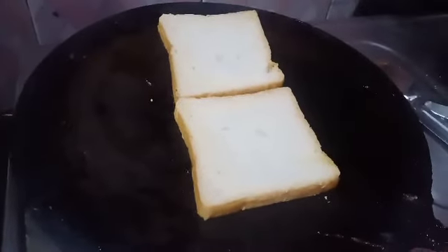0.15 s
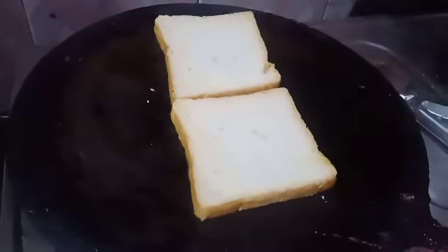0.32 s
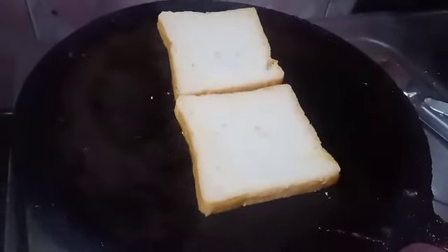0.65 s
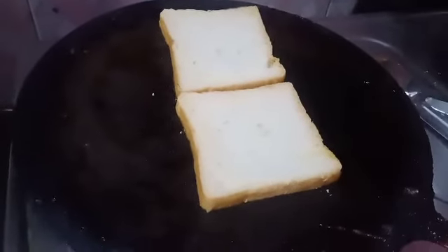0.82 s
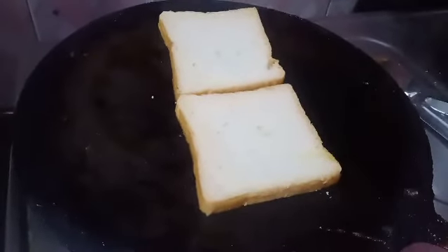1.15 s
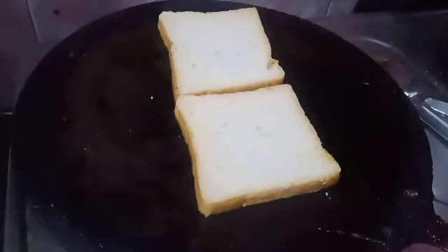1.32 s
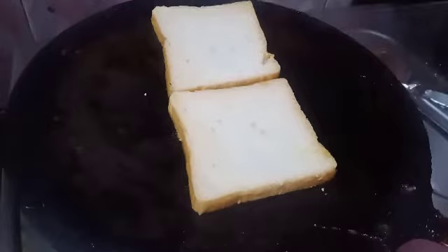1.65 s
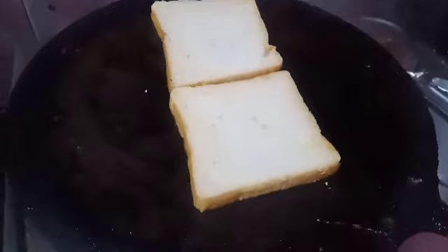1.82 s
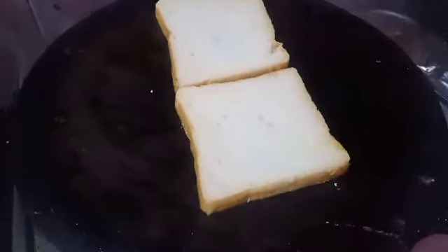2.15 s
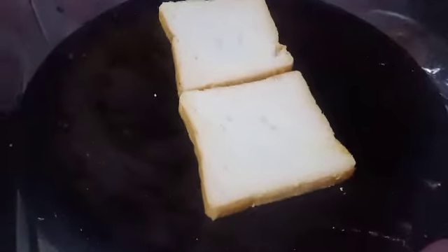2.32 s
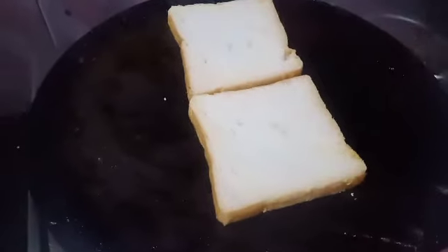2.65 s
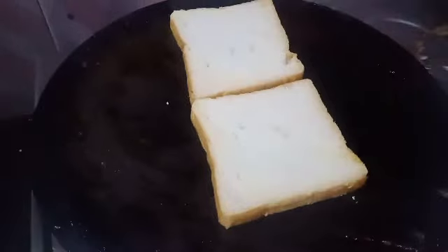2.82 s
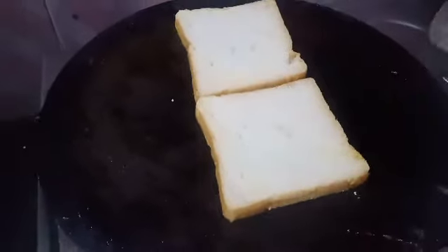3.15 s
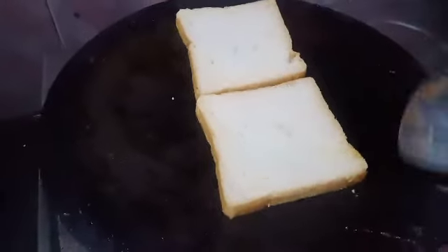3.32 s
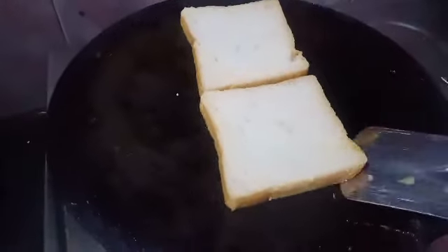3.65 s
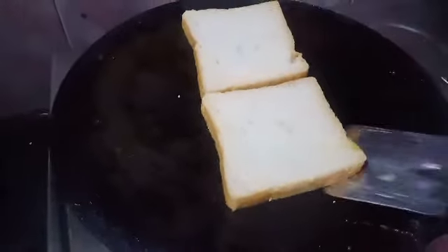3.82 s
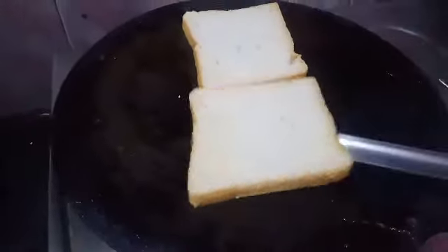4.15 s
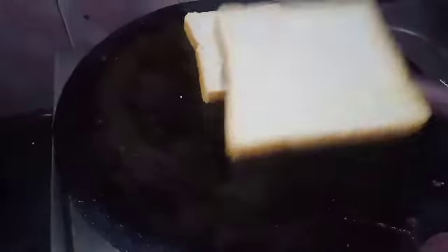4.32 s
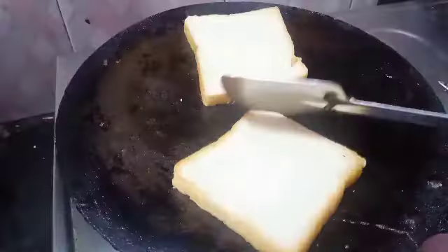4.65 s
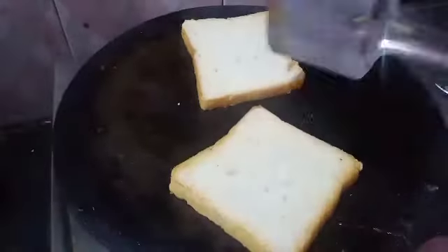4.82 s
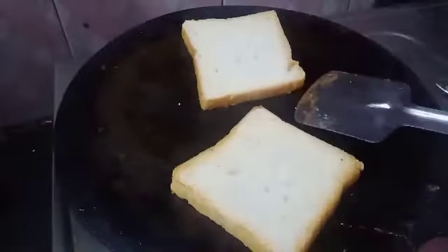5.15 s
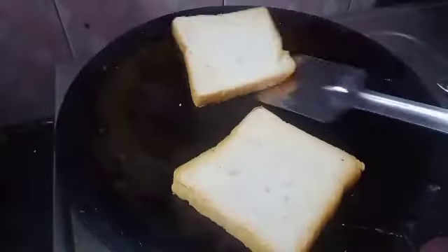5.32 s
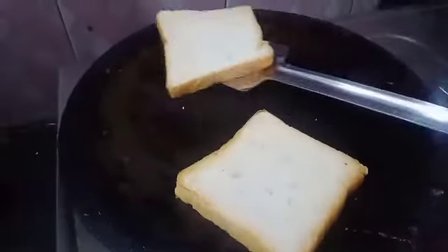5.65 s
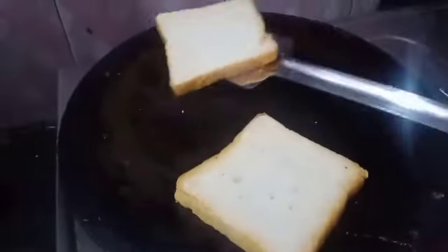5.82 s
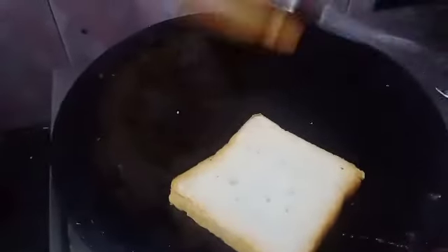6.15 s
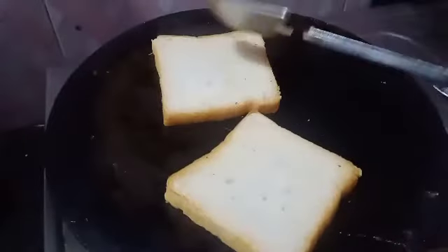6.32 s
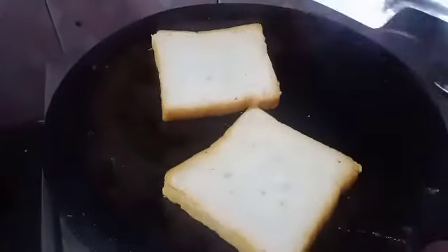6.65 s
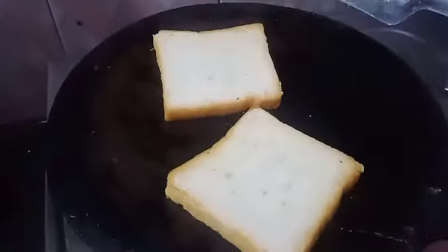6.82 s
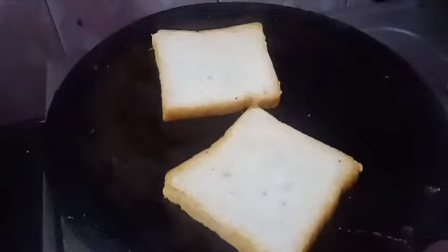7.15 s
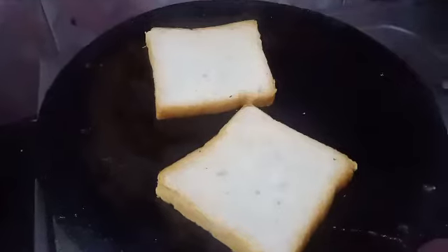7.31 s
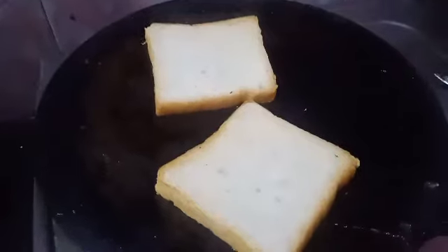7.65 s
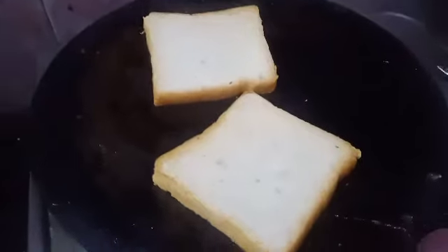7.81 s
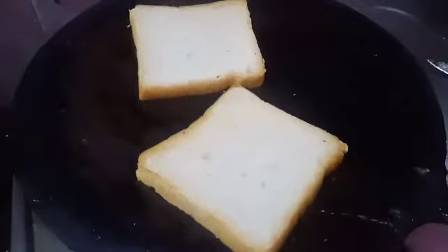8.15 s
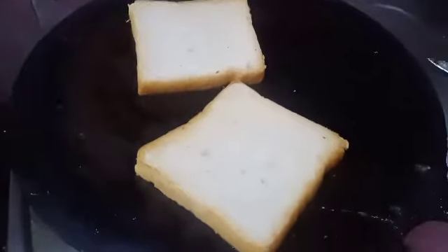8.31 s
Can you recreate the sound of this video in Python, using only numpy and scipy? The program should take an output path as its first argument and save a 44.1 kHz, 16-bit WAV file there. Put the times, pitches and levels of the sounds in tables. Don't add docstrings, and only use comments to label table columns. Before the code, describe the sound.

Faint griddle sizzle and spitting fat over distant street rumble, with a steel cup clink, ringing spatula knocks, gritty scrapes and soft bread slaps.

```python
import sys
import numpy as np
from scipy import signal
from scipy.fft import rfft, irfft, next_fast_len
from scipy.io import wavfile
from scipy.ndimage import uniform_filter1d, map_coordinates

SR = 44100
rng = np.random.default_rng(int(sys.argv[2]) if len(sys.argv) > 2 else 0)


def waveform_to_disk(signal):
    frames = np.transpose(np.atleast_2d(signal))
    scaled = np.clip(frames, -1, 1) * 32767
    samples = np.round(scaled).astype(np.int16)
    wavfile.write(sys.argv[1], SR, samples)


def boost(x):
    u = np.asarray(x, float) / 20
    return 10 ** u


N = 373022
TIME = np.arange(N) / SR


def rms_one(x):
    return x / np.sqrt(np.mean(x ** 2) + 1e-20)


def in_time(rows):
    s, *columns = np.transpose(rows)
    return [np.interp(TIME, s, c) for c in columns]


def at_hz(points, hz):
    points_hz, points_db = np.transpose(points)
    return np.interp(np.log(hz + 1), np.log(points_hz), points_db)


def coloured(x, spectrum):
    size = next_fast_len(N)
    gain = boost(at_hz(spectrum, np.arange(size // 2 + 1) * SR / size))
    return rms_one(irfft(rfft(x, size) * gain, size)[..., :N])


def drift(rate_hz):
    r = np.exp(-80 * np.pi * rate_hz / SR)
    white = rng.standard_normal(N // 40 + 2002)
    slow = signal.lfilter([1], [1, -2 * r, r * r], white)[2000:]
    return np.interp(np.arange(N) / 40, np.arange(len(slow)), rms_one(slow))


def resonance(x, hz, width_hz):
    r = np.exp(-np.pi * width_hz / SR)
    zeros = np.array([1, 0, -1]) * (1 - r * r) / 2
    poles = [1, -2 * r * np.cos(2 * np.pi * hz / SR), r * r]
    return signal.lfilter(zeros, poles, x + 1e-18)


def band(x, low_hz, high_hz):
    return signal.sosfilt(signal.butter(2, [low_hz, min(high_hz, .45 * SR)], "band", fs=SR, output="sos"), x)


def grains(per_s, spread_db):
    sizes = boost(spread_db * np.minimum(rng.exponential(1, N), 4)) * rng.choice([-1, 1], N)
    return sizes * (rng.random(N) < per_s / SR)


def struck(modes, blows, crack_octaves, crack_t60, rattle_db, uneven_db=6.0, ripple_db=3.5,
           rise_cycles=2.67, rise_s=0.00017):
    out = np.zeros(N + 32768)
    t, f = np.arange(32768) / SR, np.arange(16385) * SR / 32768 + 1
    hz, level_db, t60 = np.transpose(modes)[:, :, None]
    wobble = np.array([np.interp(t * 80, np.arange(64), row) for row in rng.standard_normal((len(modes), 64))])
    rise = np.minimum(t * hz / rise_cycles, 1) * np.minimum((t[-1] - t) / 0.13, 1)
    mode_rattle_db = rattle_db * np.sqrt(1 + hz / 3000) / (1 + t60) * wobble
    rings = boost(level_db - 60 * t / t60 + mode_rattle_db) * np.sin(2 * np.pi * hz * t) * rise
    ripple = boost(ripple_db * rms_one(uniform_filter1d(rng.standard_normal(len(f)), size=30)))
    decay = boost(-60 * t / crack_t60 + rattle_db * wobble[0]) + .5 * np.exp(-t / 0.0017)
    crack_shape = decay * np.minimum(t / rise_s, 1)
    for s, ring_db, crack_db, crack_hz in blows:
        low_hz, high_hz = crack_hz / 2 ** crack_octaves, crack_hz * 2 ** crack_octaves
        edges = 1 / (1 + (low_hz / f) ** 6) / (1 + (f / high_hz) ** 4)
        noise = rms_one(irfft(rfft(rng.standard_normal(len(t))) * ripple * edges))
        ring = boost(ring_db + uneven_db * rng.standard_normal(len(modes))) @ rings
        at = round(s * SR)
        out[at:at + len(t)] += ring + boost(crack_db) * noise * crack_shape
    return out[:N]


def spits(small_per_s):
    # start_s, peak_db
    round_spits = [(0.0124, -42), (0.2371, -33.5), (0.7478, -40), (0.847, -44), (4.5268, -35),
                   (4.5437, -25.5), (4.9412, -28), (5.238, -33), (5.9535, -40.5), (6.0973, -37),
                   (6.1094, -31.5), (6.3167, -40), (6.559, -39), (6.604, -34), (6.6184, -32), (6.6328, -31),
                   (6.8088, -43), (6.9082, -32), (7.0025, -25.5), (7.129, -25), (7.239, -34.5),
                   (7.3414, -24.5), (7.425, -37), (7.5415, -38), (7.5943, -39), (7.7313, -32),
                   (7.7552, -36), (7.8712, -27), (8.0846, -27.5)]
    # start_s, peak_db
    sharp_spits = [(0.0014, -37.5), (0.2508, -39), (0.9288, -43), (3.5887, -39), (6.265, -35),
                   (6.3761, -41), (6.4013, -34), (7.082, -39), (7.1153, -38), (7.4681, -34), (7.6962, -28),
                   (7.832, -41), (7.8982, -31), (8.022, -40), (8.0425, -30.5), (8.1044, -32.5),
                   (8.272, -39)]
    s, peak_db = np.transpose(np.concatenate([round_spits, sharp_spits]))
    bright_db = np.repeat([-21, -12], [len(round_spits), len(sharp_spits)])
    at = np.round(s * SR).astype(int)
    body = boost(-44) * grains(small_per_s, spread_db=3.0)
    top = body * boost(-13)
    body[at] = boost(peak_db + 20.0)
    top[at] = boost(peak_db + bright_db + 25)
    spray_s = 0.0064
    trail = signal.lfilter([1], [1, -np.exp(-1 / (spray_s * SR))], np.abs(body))
    spray = trail * rng.standard_normal(N) * boost(-25.0)
    broad = resonance(band(band(body + spray, 3550, 16900), 3300, 19000), 6520, 1540)
    return broad + band(top + spray * boost(-9.5), 8100, 18800)


def sizzle(hiss_db, top_db):
    # hz, db_per_hz
    hiss = [(2060, -67), (3500, -14.5), (3770, -63), (4380, -11), (4760, -9.5), (6690, 2.5), (7370, -5.5),
            (10500, -20), (13600, -28.5), (22000, -120)]
    # hz, db_per_hz
    top_hiss = [(4710, -19.5), (8000, -11), (9200, -13), (12100, -4), (14800, -2.5), (15800, 1.5)]
    bursts = grains(12000, spread_db=2.0) * boost(1.0 * drift(29.5))
    return boost(hiss_db) * coloured(bursts, hiss) + boost(top_db) * coloured(bursts, top_hiss)


def traffic():
    # hz, db_per_hz
    street_colour = [(210, -37), (350, 7.5), (378, -26.5), (599, -0.5), (675, -15), (879, -0.5),
                     (1080, -3.5), (2020, -5), (2870, 0), (4800, -13), (6240, -33), (10600, -120)]
    # time_s, level_db
    murmur = [(0, -65.5), (.6, -62), (1.4, -63), (2.1, -67), (3.1, -63.5), (4.1, -64.5), (4.9, -67),
              (5.9, -66.5), (6.6, -65.5), (7.5, -64.5), (8.46, -64)]
    white = rng.standard_normal((2, N))
    edges_hz = 330 * 2 ** np.arange(0, 4.1, .25)
    out = np.zeros(N)
    for k, (low, high) in enumerate(zip(edges_hz, edges_hz[1:])):
        level_db = at_hz(street_colour, np.sqrt(low * high)) + 3.0 * drift(5.5)
        out += boost(level_db) * band(white[k % 2], low, high)
    rumble = boost(-73.5) * rms_one(band(white[1], 35, 215))
    return boost(in_time(murmur)[0]) * rms_one(out) + rumble


def swells(rows, floor_db):
    rise_s, fall_s = 0.023, 0.021
    s, hold_s, db = np.transpose(rows)[:, :, None]
    t = TIME[::100]
    shape = np.exp(-np.maximum(s - t, 0) / rise_s - np.maximum(t - s - hold_s, 0) / fall_s)
    return boost(floor_db + 3.4 * drift(4.2)) + np.interp(TIME, t, np.sum(boost(db) * shape, axis=0))


def booms():
    # hz, width_hz
    room_modes = [
        (98, 29.2),
        (245, 71),
    ]
    # start_s, hold_s, level_db
    low_swells = [(0.067, 0.33, -60.5), (1.198, 0.058, -58.5), (3.32, 0.032, -64), (3.77, 0.025, -55.5),
                  (4.375, 0.031, -59), (4.864, 0.025, -56), (5.163, .02, -67), (5.7, 0.054, -64),
                  (6.123, 0.024, -54), (6.336, 0.032, -55), (6.66, 0.015, -61), (7.15, 0.026, -53.5),
                  (7.596, 0.12, -55), (7.978, 0.038, -47)]
    # start_s, hold_s, level_db
    upper_swells = [(1.398, 0.015, -56), (2.372, 0.14, -53.5), (2.664, 0.14, -51.5), (3.34, .04, -60),
                    (4.242, 0.071, -61.5), (4.576, 0.05, -52.5), (4.844, 0.017, -67), (5.142, 0.016, -62),
                    (5.328, 0.2, -59), (6.124, 0.063, -62), (7.033, 0.047, -60.5), (7.252, 0.02, -57), ]
    out = np.zeros(N)
    for (hz, width_hz), rows, floor_db in zip(room_modes, (low_swells, upper_swells), (-69.5, -70.5)):
        noise = resonance(resonance(rng.standard_normal(N), hz, width_hz), hz, width_hz)
        out += swells(rows, floor_db) * rms_one(noise)
    return out


def far_tones():
    # start_s, end_s, pitch_hz, width_hz, level_db
    tones = [(0, 0.89, 3400, 115, -61.5), (6.85, 7.1, 935, 30, -63), (7.04, 7.24, 1050, 12, -60),
             (7.35, 7.52, 840, 91, -65), (7.75, 7.9, 1080, 40, -67), (8.1, 8.25, 900, 40, -66),
             (1.5, 1.65, 600, 45, -68), (7.38, 7.5, 2870, 300, -65), (4.45, 4.8, 3450, 60, -69),
             (4.5, 4.93, 4760, 60, -73), (8.1, 8.3, 3350, 60, -68)]
    white, out = rng.standard_normal(N), np.zeros(N)
    for start, end, hz, width_hz, db in tones:
        span = slice(max(round((start - .2) * SR), 0), round((end + .1) * SR))
        t = TIME[span]
        swell = np.clip(np.minimum(t - start + 0.013, end - t + 0.023) / 0.051, 0, 1)
        out[span] += boost(db) * swell * rms_one(resonance(resonance(white[span], hz, width_hz), hz, width_hz))
    return out


def cup():
    cup_hz = [700, 1370, 2750, 3050, 3078, 3117, 4436, 5204, 5222, 6573, 6980, 7085, 8872, 9609, 9771,
              10820, 10980, 11490, 13890, 14730, 15360]
    # level_db, t60_s
    cup_ring = [(-25, .15), (-23, .13), (-18, .07), (-9, .22), (3, .42), (-10, .3), (-28, .1), (-4, .45),
                (-14, .3), (-16, .14), (-6, .25), (-16, .25), (-10, .22), (-18, .18), (-14, .2), (-9, .12),
                (-12, .2), (-15, .2), (-24, .11), (-18, .2), (-18, .12)]
    # start_s, ring_db, crack_db, crack_hz
    cup_blows = [
        (.9912, -33, -26, 8100),
        (.9991, -27, -42, 1500),
        (1.0088, -38, -33, 9000),
        (1.0254, -27, -40, 8500),
        (1.101, -46, -50, 12400),
        (1.139, -46, -51, 10000),
    ]
    gripped_s, grip_db_per_s = 1.17, 170
    rings = struck(np.column_stack([cup_hz, cup_ring]), cup_blows, .8, .1, rattle_db=.6, uneven_db=.6)
    return rings * boost(-grip_db_per_s * np.clip(TIME - gripped_s, 0, 1))


def stove_knocks():
    # pitch_hz, level_db, t60_s
    stove_modes = [(314.3, 4, 0.18), (748, -9, 0.22), (947, -8, 0.14), (1314, -10, 0.14), (1507, -14, 0.12),
                   (2439, -13, 0.09), (3930, -13, 0.088), (4280, -23, 0.14), (7200, -24, .11)]
    # start_s, ring_db, crack_db, crack_hz
    stove_blows = [
        (2.369, -41, -32.5, 1460),
        (2.37, -50, -36.5, 9500),
        (2.383, -38, -32, 880),
    ]
    # start_s, ring_db, crack_db, crack_hz
    stove_slides = [
        (2.43, -67, -43, 1800),
        (2.479, -51.5, -44, 1800),
    ]
    knock = struck(stove_modes, stove_blows, 1.5, 0.1, rattle_db=4.0, rise_s=.0015)
    return knock + struck(stove_modes, stove_slides, 2.7, 0.2, rattle_db=2.5, rise_s=0.027)


def rubbed(catches, t, modes, wander_db):
    # time_s, pitch_hz, boost_db
    bites = [(2.465, 14200, 8), (2.47, 10600, 8), (3.745, 1260, 6), (3.815, 1260, 8), (3.86, 1260, 8),
             (3.87, 2310, 12), (3.945, 2310, 10), (3.95, 1260, 4), (3.945, 7890, 8), (3.79, 10800, 6),
             (5.325, 1570, 11), (5.358, 1570, 10), (5.388, 1570, 7)]
    bite_s = 0.0091
    out = 0
    for hz, width_hz, db in modes:
        bite_db = 0
        for s, bitten_hz, boost_db in bites:
            if abs(hz / bitten_hz - 1) < .04:
                bite_db = bite_db + boost_db * np.exp(-((t - s) / bite_s) ** 2)
        ring = rms_one(resonance(resonance(catches, hz, 0.75 * width_hz), hz, 5.4 * width_hz))
        grip_db = wander_db * drift(18.6)[:len(t)]
        out = out + boost(db + bite_db + grip_db) * ring * np.sqrt(width_hz)
    return out


def scrapes():
    # time_s, level_db
    strokes = [
        [(2.39, -55), (2.44, -57), (2.5, -48), (2.54, -53), (2.62, -79)],
        [(3.72, -45), (3.76, -44), (3.81, -38), (3.87, -37.5), (3.9, -49), (3.945, -38.5), (3.985, -50.5),
         (4.06, -67), (4.15, -71)],
        [(5.08, -50), (5.14, -49.5), (5.23, -43.5), (5.31, -45), (5.36, -40.5), (5.42, -48), (5.5, -57.5),
         (5.65, -76)],
    ]
    # pitch_hz, width_hz, level_db
    drag_low = [
        [(722, 37, 9), (1060, 23, 4), (1300, 50, -6), (1570, 35, -9), (1890, 87, -18), (2260, 130, -14),
         (3500, 22, -13), (3810, 110, -16), (4700, 34, -11)],
        [(1266, 57, -3.5), (1520, 52, -1), (1890, 33, -9), (2314, 61, -1), (2520, 29, -1), (3150, 110, -10),
         (3360, 62, -19), (3530, 40, -10), (4400, 47, -9), (4200, 44, -11), (4840, 63, -11)],
        [(1400, 26, 2), (1564, 86, -0.5), (1857, 31, 0), (2090, 35, -7), (2356, 100, -5), (2660, 27, -22),
         (3130, 53, -18), (3400, 79, -8), (4050, 43, -22), (4450, 64, -33), (4700, 110, -32)],
    ]
    # pitch_hz, width_hz, level_db
    drag_high = [
        [(6200, 190, -9), (7240, 37, 4), (7910, 28, 4), (8580, 46, -17), (9050, 46, -15), (10700, 34, -2),
         (12600, 42, -13), (13300, 32, -13), (14200, 45, 0), (14900, 120, -13)],
        [(5500, 38, -6), (5700, 130, -16), (6200, 120, -8), (7000, 29, -1), (7250, 39, -1), (7820, 50, -1),
         (10000, 110, -19), (10800, 48, -6.5), (12600, 160, -20), (13100, 83, -16), (14000, 160, -15),
         (15400, 200, -20)],
        [(5410, 91, 0), (5750, 130, -1), (6120, 80, 3), (6800, 64, 2), (7210, 61, -9), (7890, 65, -4),
         (9100, 50, -3), (9700, 150, -19), (10900, 260, -24), (13100, 85, -13), (14200, 34, -10),
         (15200, 67, -15)],
    ]
    drag_high_db = [-5, -11, -8.5]
    # upper_db, upper_db_per_s, hum_db, hum_db_per_s
    stroke_colour = [
        (3, -3, -75, -10),
        (-6.5, 19.5, -67, -51),
        (-8, 25, -63, 17),
    ]
    # pitch_hz, width_hz, level_db
    plate_hum = [
        (317, 8.9, 1.5),
        (566, 73, -16),
        (840, 250, -19),
    ]
    # hz, db_per_hz
    grit_colour = [(1530, -36), (2600, 2), (3480, -3), (3810, -4.5), (6320, 0.5), (8530, -15), (11600, -17),
                   (15500, -11.5)]
    firm_db = -43.5
    catches = grains(4000, spread_db=2.0) * boost(.8 * drift(23.5) + 1.5 * drift(120))
    grit = coloured(catches, grit_colour)
    out = np.zeros(N)
    for stroke, low, high, high_db, colour in zip(strokes, drag_low, drag_high, drag_high_db, stroke_colour):
        upper_db, upper_db_per_s, hum_db, hum_db_per_s = colour
        span = slice(round(stroke[0][0] * SR), round(stroke[-1][0] * SR))
        t, rub = TIME[span], catches[span]
        ring_db, gone_s = in_time(stroke)[0][span], t - stroke[0][0]
        upper_db = upper_db + upper_db_per_s * gone_s
        grit_db = np.minimum(0.69 * (firm_db - ring_db), -1.5)
        hum_db = hum_db + hum_db_per_s * gone_s + 0.82 * (ring_db - firm_db)
        lower = rubbed(rub, t, low[:3], wander_db=4.0)
        upper = rubbed(rub, t, low[3:], wander_db=4.0)
        upper = upper + boost(high_db) * rubbed(rub, t, high, wander_db=4.0)
        blade = (lower + boost(upper_db) * upper) / np.std(lower + upper) + boost(grit_db - 2.0) * grit[span]
        hum = boost(hum_db) * rms_one(rubbed(rub, t, plate_hum, wander_db=7.0))
        out[span] = np.minimum(gone_s / 0.037, 1) * (boost(ring_db) * blade + hum)
    return out


def blade_knocks():
    # pitch_hz, level_db, t60_s
    lifted_modes = [(232, 0, .2), (473, -10, .13), (678, -17, .12), (980, -19, .13), (1266, -12, .1),
                    (1425, -17, .3), (1518, -9, .14), (1878, -17, .1), (2330, -21, .09), (3558, -27, .6),
                    (4414, -33, .25), (4861, -29, .22), (6530, -28, .06), (11000, -30, .04)]
    set_down_modes = [(231, 2, .3), (463, -6, .22), (1265, -9, .2), (1534, -3, .16), (1868, -9, .12),
                      (2358, -10, .08), (3585, -13, .15), (4845, -22, .1), (5577, -22, .12),
                      (6729, -18, .08), (7827, -20, .07), (10050, -28, .06), (14230, -20, .05)]
    landing_modes = [(720, -5.5, 0.25), (1360, 0.5, .12), (1550, -4, 0.092), (2310, -2, 0.06),
                     (2775, -6, .1), (3540, 0.5, 0.058)]
    iron_modes = [(1280, -11, .2), (1405, -13, 0.17), (1543, -7, 0.2), (2450, -18, 0.12), (3055, -11, 0.14),
                  (3570, -8, .12), (5110, -41, 0.14), (5230, -11, 0.08), (6643, -14, 0.12), (7060, -16, .1),
                  (7760, -12, 0.1), (8980, -22, 0.08), (10600, -27, .1)]
    tip_modes = [(4759, -26, .3), (5750, 0, .9), (5812, -5, .5)]
    # start_s, ring_db, crack_db, crack_hz
    lift_blows = [
        (2.641, -25.5, -44, 1020),
        (2.66, -41, -49, 1280),
        (2.717, -41, -53, 1500),
    ]
    set_down_blows = [
        (2.764, -69, -62, 3700),
        (2.777, -39.5, -43.5, 3470),
        (2.796, -45, -42, 2500),
        (2.828, -45.5, -48.5, 7900),
    ]
    landing_blows = [
        (3.674, -43.5, -42, 1900),
        (3.686, -46, -43.5, 1470),
        (3.705, -51, -52, 1500),
        (3.739, -50, -41, 1790),
    ]
    iron_blows = [
        (4.263, -68, -42.5, 4300),
        (6.335, -64, -52.5, 1630),
    ]
    tip_blows = [
        (4.94, -46, -50, 5900),
        (4.98485, -48, -60, 5900),
        (5.01875, -46, -41, 8400),
    ]
    edge_blows = [
        (5.027, -29, -31, 4500),
    ]
    lifted = struck(lifted_modes, lift_blows, 1.2, 0.14, rattle_db=2.0, uneven_db=1.5, rise_s=0.004)
    set_down = struck(set_down_modes, set_down_blows, 1.1, .08, rattle_db=2.5, uneven_db=2.5, rise_s=.002)
    landing = struck(landing_modes, landing_blows, 1.17, 0.16, rattle_db=2.5, uneven_db=-1.5, rise_s=0.0037)
    iron = struck(iron_modes, iron_blows, 0.88, 0.25, rattle_db=2.0, rise_s=0.0031)
    tip = struck(tip_modes, tip_blows, 1.5, .04, rattle_db=2.0, uneven_db=1.0)
    edge = struck(iron_modes, edge_blows, 1.1, 0.13, rattle_db=2.0, uneven_db=1.0, rise_s=.0007)
    return lifted + set_down + landing + iron + tip + edge


def blade_sings():
    # start_s, pitch_hz, level_db, rise_s
    free_ring = (2.74, 1403.5, -54, .08)
    # pitch_hz, level_db, t60_s
    rim_modes = [(738, -38, .15), (969, -25, .25), (1246, -19, 0.25), (1403, -4.5, 0.42), (1543, 0, 0.15),
                 (1880, -26, .3), (2449, -18, .2), (2780, -28.5, .2), (3290, -26, 0.22), (3520, -31, .22),
                 (4030, -25, .14), (4500, -27.5, .2), (5140, -30, .2), (5320, -11, 0.09), (5750, -12, 0.12),
                 (6519, -11, 0.09), (7246, -18, 0.25), (7876, -24, .15), (10700, -24, .08),
                 (14200, -26, .06)]
    # start_s, ring_db, crack_db, crack_hz
    rim_blows = [
        (3.292, -19, -27, 4300),
    ]
    rim_settles = [
        (3.31, -70, -49, 2400),
        (3.43, -60, -60, 1700),
        (3.5, -62, -58, 1250),
    ]
    start, hz, db, rise_s = free_ring
    gate = np.clip((TIME - start) / rise_s, 0, 1) * np.clip((rim_blows[0][0] - TIME) * 200, 0, 1)
    free = boost(db + .8 * drift(6)) * gate * np.sin(2 * np.pi * hz * TIME)
    knock = struck(rim_modes, rim_blows, 0.7, .11, rattle_db=.8, uneven_db=0.0)
    buzz = struck(rim_modes[2:9], rim_settles, .8, .6, rattle_db=3.0, rise_s=.02)
    return free + knock + buzz


def slice_flips():
    # pitch_hz, level_db, t60_s
    first_modes = [(237, 0, .35), (501, -14, .2), (980, -12, .12), (1270, -5, .2), (1390, -10, .2),
                   (1540, 0, .17), (1890, -16, .1), (2260, -16, .15), (2910, -17, .15), (3560, -19, .15),
                   (4330, -22, .15)]
    second_modes = [(221, 0, .2), (600, -16, .15), (721, -13, .15), (840, -12, .2), (1040, -12, .1),
                    (1240, -14, .2), (1540, -10, .18), (2290, -17, .15), (3140, -20, .12)]
    # start_s, ring_db, crack_db, crack_hz
    first_blows = [
        (4.5425, -40, -41, 1000),
        (4.61, -58, -52, 1500),
        (4.66, -64, -58, 1400),
    ]
    second_blows = [
        (6.097, -62, -46.5, 1540),
        (6.109, -38, -44.5, 1190),
        (6.124, -52, -46.5, 980),
        (6.145, -67, -49.5, 980),
        (6.18, -62, -59, 1400),
    ]
    first = struck(first_modes, first_blows, 1.1, 0.14, rattle_db=2.5, uneven_db=2.0, rise_s=.002)
    return first + struck(second_modes, second_blows, 1.1, 0.14, rattle_db=2.5, uneven_db=2.0, rise_s=.002)


def kitchen(x):
    t60_s, wall_cut_hz = 0.4, 2700
    t = np.arange(16384) / SR
    noise = rng.standard_normal((2, len(t))) * np.clip((t - .003) / 0.0036, 0, 1)
    dull = signal.sosfilt(signal.butter(1, wall_cut_hz, fs=SR, output="sos"), noise)
    tails = dull * boost(-60 * t / t60_s) + (noise - dull) * boost(-90 * t / t60_s)
    return signal.oaconvolve(x[None], tails / np.linalg.norm(tails[0]), axes=1)[:, :N]


def flecked(x):
    patch_hz, patch_s, patch_db, hole_db = 90, .07, 3.0, 9.0
    hz, s, cells = signal.stft(x, SR, nperseg=1024)
    places = np.meshgrid(hz / patch_hz, s / patch_s, indexing="ij")
    field = rms_one(map_coordinates(rng.standard_normal((256, 256)), places, order=1))
    field = field * ((hz > 300) & (hz < 5000))[:, None]
    gain = boost(patch_db * field - hole_db * np.maximum(-field - 1, 0))
    return signal.istft(cells * gain, SR, nperseg=1024)[1][:N]


def scene():
    # time_s, level_db
    frying = [(0, -9), (.3, -24), (1, -7.5), (1.7, -6), (2.3, 2), (3.1, -0.5), (4.1, -1.5), (5.6, -4),
              (5.95, -7), (6.25, 4.5), (7, 1.5), (7.9, 9), (8.46, 2)]
    vigour_db, = in_time(frying)
    near = spits(6.1 * boost(0.82 * vigour_db)) + stove_knocks() + scrapes() + blade_knocks() + slice_flips()
    close = cup() + blade_sings()
    echoes = boost(-6) * kitchen(near + boost(-9) * close)
    near = near + close
    background = sizzle(-58.5 + 0.21 * vigour_db, -64.5 + vigour_db) + traffic() + booms() + far_tones()
    middle = near + echoes[0] + flecked(background)
    late = np.roll(middle - near, 900) + echoes[1]
    side = boost(-16.0) * band(band(late, 7400, 16000), 6000, 15300)
    side += boost(-19.5) * band(late, 20, 1500) + boost(-13.0) * band(late, 23, 69)
    return middle + np.array([[1], [-1]]) * side


def band_limit(x):
    return signal.sosfilt(signal.butter(12, 16650, fs=SR, output="sos"), x)


def record(dry):
    # hz, left_minus_right_db
    lean = [(60, 0.5), (250, 4), (800, 4), (1250, 9), (2000, 4), (5650, 4.5), (5950, 0), (6850, 0.5),
            (7100, -7), (9300, -18), (10200, -21), (11500, -25.5), (12600, -2), (14000, -10), (16000, 19)]
    size = next_fast_len(N)
    ratio = boost(at_hz(lean, np.arange(size // 2 + 1) * SR / size))
    mid, side = (dry[0] + dry[1]) / 2, (dry[0] - dry[1]) / 2
    side = side + irfft(rfft(mid, size) * (ratio - 1) / (ratio + 1), size)[:N]
    top_cut = signal.cheby2(16, 36, 15800, fs=SR, output="sos")
    return band_limit(signal.sosfilt(top_cut, [mid + side, mid - side]))


dry = scene()
out = record(dry)
waveform_to_disk(out)
```